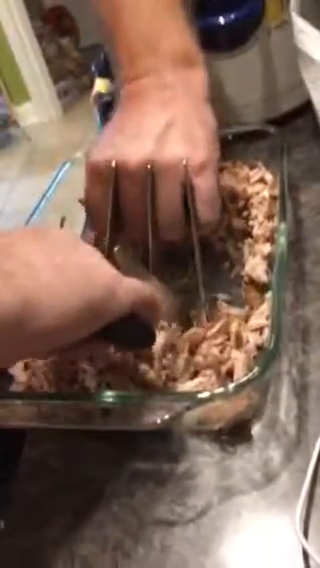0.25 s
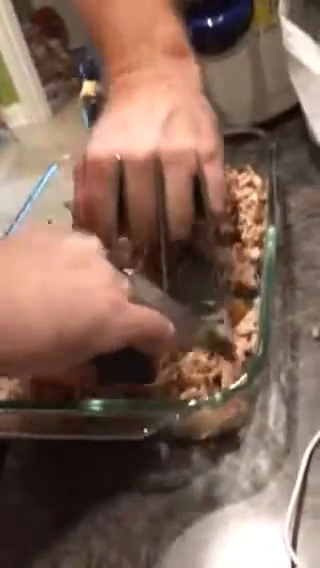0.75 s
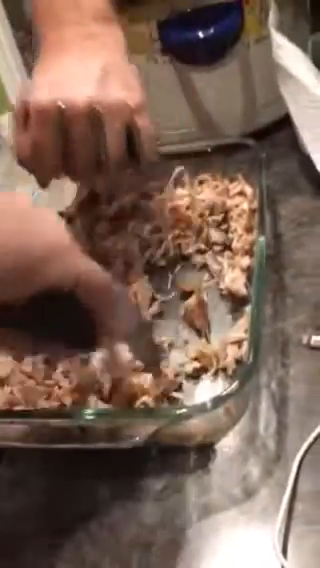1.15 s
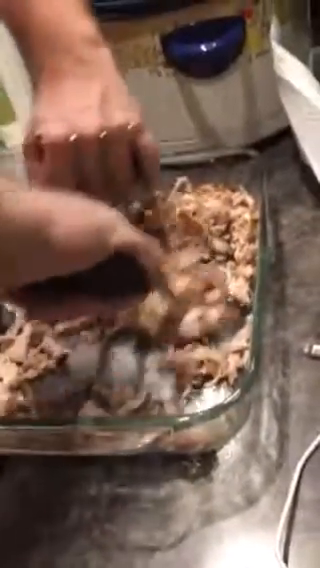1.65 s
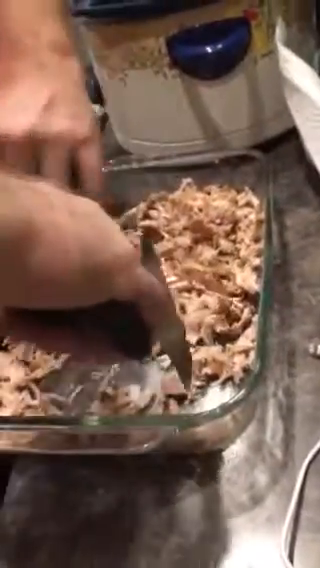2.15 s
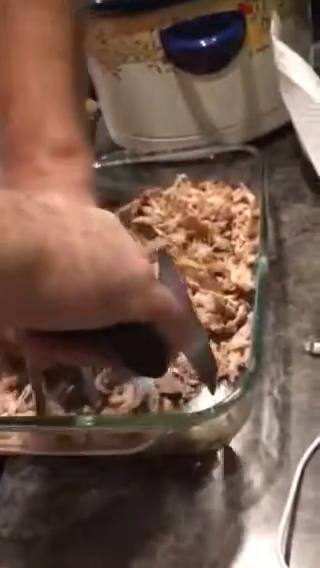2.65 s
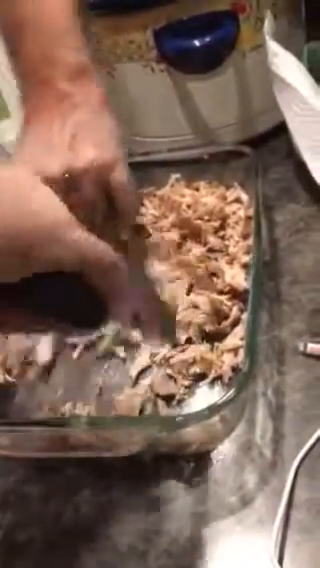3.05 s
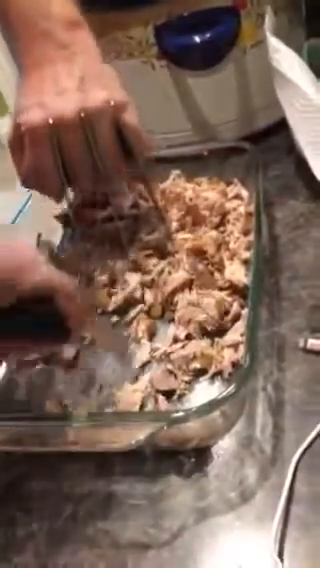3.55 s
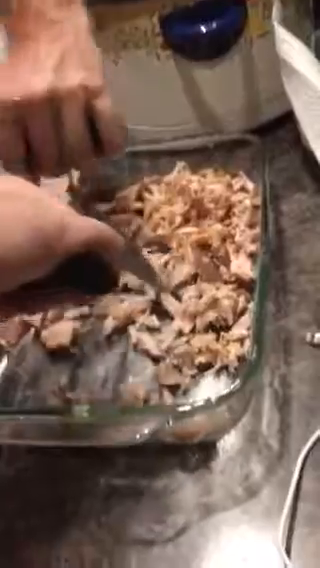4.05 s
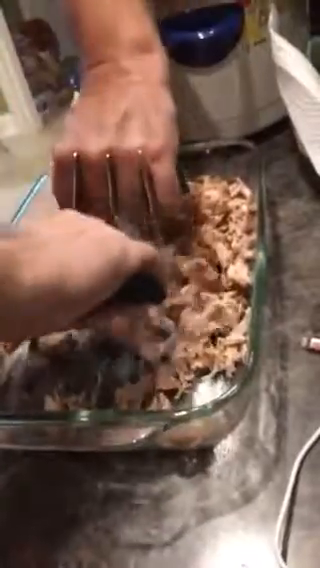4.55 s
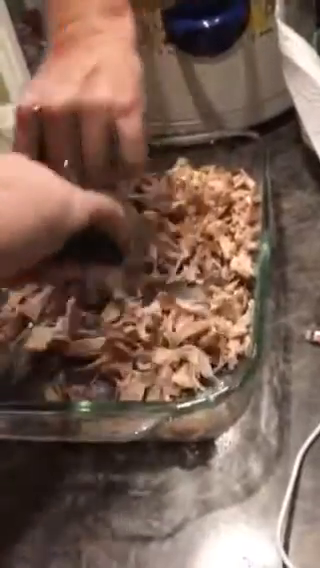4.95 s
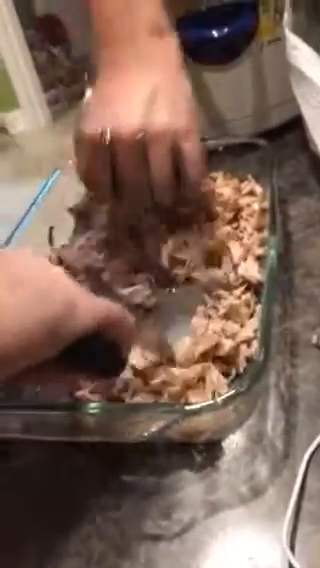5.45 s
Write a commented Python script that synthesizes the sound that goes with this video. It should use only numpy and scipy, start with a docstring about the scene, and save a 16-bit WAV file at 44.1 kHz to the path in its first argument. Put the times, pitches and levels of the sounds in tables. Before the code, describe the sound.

Close, sharp steel-on-glass clinks with short gritty scrapes, separated by quiet pauses over a faint low hum and soft hiss.

```python
"""Pulling cooked meat apart with steel claws

Steel claws shred meat in a glass dish on a kitchen counter, close to a phone.
Each knock rings sets of fading tones for dish, claw and counter, with a burst of noise for the chatter.
Each drag sends gritty noise through the dish and claw tones, with a hollow note and a thin steel hiss.
Behind them are the room's echo, a fridge hum of wavering tones, and soft shaped hiss."""
import sys
import numpy as np
from scipy import signal
from scipy.fft import rfft, irfft
from scipy.io import wavfile
from scipy.ndimage import uniform_filter1d

SR = 44100
rng = np.random.default_rng(int(sys.argv[2]) if len(sys.argv) > 2 else 0)


def bounce(signal):
    """Save signal as a 16-bit WAV file at the path given by the first command-line argument."""
    frames = np.transpose(np.atleast_2d(signal))
    limited = np.clip(frames, -1, 1)
    pcm = np.round(limited * 32767).astype(np.int16)
    wavfile.write(sys.argv[1], SR, pcm)


N = 251590  # length in samples


def undb(db):
    """Turn decibels into a plain amplitude factor."""
    return 10 ** (np.asarray(db) / 20)


def level(x, db):
    """Scale a sound to an rms level in dB."""
    return x * undb(db) / np.sqrt(np.mean(x ** 2))


def band(x, lo_hz, hi_hz, order=2):
    """Keep the range between two frequencies; 0 leaves that edge open."""
    if lo_hz:
        x = signal.sosfilt(signal.butter(order, lo_hz, "high", fs=SR, output="sos"), x)
    if hi_hz:
        x = signal.sosfilt(signal.butter(order, hi_hz, fs=SR, output="sos"), x)
    return x


def ring(modes, freedom, gain_db=0, phase=0, size=12000):
    """Add up a body's natural tones (modes), each dying away; freedom scales their ring times."""
    hz, db, t60 = np.transpose(modes)[:, :, None]
    t = np.arange(size) / SR
    fade = np.exp(-np.log(1000) * t / (t60 * freedom))
    tones = undb(db + gain_db) * fade * np.sin(2 * np.pi * hz * t + phase)
    return tones.sum(axis=0)


def walk(rate):
    """Draw random values at a rate per second and smooth them twice; they spread around 0 by about 1."""
    k = int(SR / rate)
    steps = np.repeat(rng.standard_normal(N // k + 1), k)
    smooth = uniform_filter1d(uniform_filter1d(steps, k), k)
    return 1.3 * smooth[:N]


# Natural tones of the counter, the glass dish and the steel claw.
# Each row: frequency in Hz, relative level in dB, time in seconds to fall 60 dB when free.
COUNTER_MODES = [(96, -17, 0.1), (142.7, -7, 0.28), (168.4, -5.5, 0.17), (179, -21.5, .1), (259, -14, 0.12),
                 (321, -16, .1), (361.1, -7, 0.044), (525, -17, 0.1)]
DISH_MODES = [(684, -26.5, 0.027), (860, -8.5, 0.061), (968, -0.5, 0.097), (1090, -10, .06),
              (1212, -7.5, 0.33), (1305, -6, 0.21), (1420, -10, 0.21), (1617, -2.5, 0.059), (1642, -9, .06),
              (1886.6, -5.5, .07), (2090, -4.5, 0.094), (1957, -2.5, .08), (2142, 1, 0.096),
              (2322.5, -7.5, 0.057), (2386, -0.5, .1), (2546, -2.5, .07), (2746, -7.5, 0.099),
              (2862, -5, 0.1), (3045, -3.5, 0.09), (3016, -10.5, 0.098), (3300, -4.5, 0.15),
              (3395, -12.5, .07), (3635, -11.5, 0.059)]
CLAW_MODES = [(3805, -5.5, .13), (4000, -6, 0.15), (4206, -2.5, .13), (4514, -6, .12), (4910, -12, .1),
              (5090, -9.5, .13), (5355, -9, 0.061), (5494, -8.5, 0.15), (5540, -8, .2), (6200, -12, .07),
              (6380, -11, .07), (6413, -8.5, 0.11), (6710, -12, 0.12), (7080, -12, .1), (7760, -12.5, .1),
              (8600, -12, 0.17), (9220, -15.5, 0.12), (9770, -17, 0.099), (10240, -18.5, .09),
              (10800, -20.5, 0.069)]
# Edges in Hz of six bands, low to high: thud, dish bottom, dish body, dish wall, claw ring, tick.
KNOCK_EDGES_HZ = (70, 220, 600, 1500, 3200, 7000, 13000)
# Tines hitting the glass. Each row: time in seconds, dish-wall peak in dB before the final shaping,
# then thud, dish bottom, dish body, claw ring and tick in dB relative to that peak,
# favoured notes of dish body, dish wall and claw in Hz, contact time in milliseconds.
KNOCKS = [(0.0167, -46.5, -16, -14.5, 5.5, -30, -14, 1210, 2430, 4170, 6.9),
          (0.3502, -8, -28.5, -39.5, -9.5, 3.5, -8.5, 1010, 2340, 4115, 6.4),
          (0.741, -68, 3.5, 9, 7.5, -6, -17, 800, 1750, 4000, 19),
          (0.7764, -35, -36, -50, -9, 18.5, 23.5, 1354, 2580, 4600, 1.5),
          (0.9362, -9.5, -22, -22.5, -10.5, 1, -14, 1300, 2100, 3620, 9.6),
          (0.9589, -1.5, -32.5, -53, -17, 1.5, -8, 967, 2310, 5520, 3.7),
          (1.0601, -29.5, -26.5, -37, -18, -18, -33, 966, 2210, 3850, 7.3),
          (1.5588, -8.5, -27.5, -35, -3.5, -25.5, -27, 1436, 2970, 3800, 5.3),
          (1.5712, -20.5, -14.5, -6, 8, -1.5, -22, 943, 1880, 3800, 6.2),
          (1.7805, -28.5, -18.5, -13, 4, -18.5, -24, 786, 1730, 4220, 14.2),
          (1.793, -35.5, -5, -25, 7.5, -25.5, -24.5, 920, 1700, 4470, 2),
          (2.8921, -17.5, -31, -22, -15, 1, -11.5, 960, 2326, 4150, 4.8),
          (3.0117, -24.5, -41, -28, -19, 11, 9.5, 960, 2830, 6130, 2.6),
          (3.0206, -23, -33, -28, -26, 2.5, 11, 1240, 2500, 6380, 1.8),
          (3.0924, -20, -55, -41, -9, -5.5, -19, 970, 1620, 4600, 6.4),
          (3.1168, -27.5, -45, -45, -38, -18, -35, 1440, 2090, 4200, 3.8),
          (3.5333, -3, -19, -14, -4.5, -2.5, -15.5, 856, 2103, 3940, 6.5),
          (3.703, -18, -23.5, -22, -2, -17, -29, 990, 2120, 4200, 5),
          (3.7278, -28.5, -36.5, -24.5, -3, -6, -24.5, 977, 2030, 3850, 3.9),
          (3.7998, -49.5, -4.5, -8, -15.5, 5.5, 12, 980, 1930, 7190, 9.1),
          (4.5488, -6, -35, -27, -13, -0.5, -11.5, 1196, 2430, 5355, 5.4),
          (4.593, -14, -28.5, -38, -6, -3.5, -20, 1300, 2410, 4500, 4.9),
          (4.7125, -40, -7, -5.5, -27, 4.5, -4, 960, 1970, 4020, 3.3),
          (4.7549, -47, 0, 2.5, 9, 2, -10, 860, 2280, 4080, 1.9),
          (5.288, -5.5, -26.5, -26, -12, 1.5, -11, 1213, 2330, 4374, 10),
          (5.311, -25.5, -43, -21, -39, 9, 7, 1460, 2480, 5600, 4.5),
          (5.3351, -17.5, -26, -40, -24, -4.5, -28, 1500, 1920, 4200, 4.2),
          (5.3531, -24.5, -23, -26, -4.5, -0.5, -12, 1500, 2310, 4170, 8.1),
          (5.5405, -42, -21.5, -26, -3, 0, -13, 762, 2630, 6650, 3.8)]
FREEDOM = 0.85  # share of their free ring time that the meat leaves the modes
# The struck tine buzzes on: rms level in dB before its fade and the claw band's gain, free ring time, blur.
TINE_DB, TINE_T60_S, TINE_BLUR_HZ = -38, 0.45, 70


def knocks(crack_db=7.5, tail_db=-17.5, favour_db=7.5, favour_width=0.03, rattle_db=-11.0, rattle_s=0.018):
    """Each blow rings dish and claw, loud while the tines chatter, then quieter; the counter answers."""
    size = 12000
    out, t = np.zeros(N + size), np.arange(size) / SR
    modes = DISH_MODES + CLAW_MODES
    hz = np.array(modes)[:, :1]
    chance = rng.standard_normal((len(KNOCKS), 2, size))
    for row, (crack_noise, luck_noise) in zip(KNOCKS, chance):
        s, db, thud, bottom, body, claw, tick, *notes_hz, contact_ms = row
        # where the tine lands favours the modes near three notes
        near = sum(np.exp(-(np.log(hz / note) / favour_width) ** 2) for note in notes_hz)
        # random changes of each mode's level and phase
        luck_db, luck_phase = 2 * luck_noise[:2 * len(modes)].reshape(2, -1, 1)
        rung = ring(modes, FREEDOM, favour_db * near + luck_db, luck_phase)

        contact = 1000 * t / contact_ms
        chatter = np.exp(-contact ** 1.2)
        rattle = undb(rattle_db) * np.exp(-t / rattle_s)
        noise = crack_noise * (undb(crack_db) * chatter + rattle)
        blow = rung * (chatter + undb(tail_db)) + band(noise, 700, 6400, order=1)
        blow *= np.minimum(contact / 0.23, 1)  # the onset takes about a quarter of the contact

        under = ring(COUNTER_MODES, FREEDOM, luck_phase[:len(COUNTER_MODES)])  # same draws, now as dB
        under *= np.minimum(t / .004, 1)

        # the counter fills the two lowest bands, the blow the other four
        sources = (under, under, blow, blow, blow, blow)
        edges = zip(sources, KNOCK_EDGES_HZ, KNOCK_EDGES_HZ[1:])
        parts = [band(x, lo, hi, order=3) for x, lo, hi in edges]
        gains_db = db + np.array([thud, bottom, body, 0, claw, tick])

        # slow noise blurs the tine's ringing note into a buzz
        blur = level(band(luck_noise, 0, TINE_BLUR_HZ), TINE_DB)
        buzz = blur * ring([(notes_hz[-1], 0, TINE_T60_S)], 0.89)
        parts[4] = parts[4] / np.abs(parts[4]).max() + buzz

        start = max(int((s - .001) * SR), 0)  # begin 1 ms ahead of the listed time
        out[start:start + size] += sum(undb(g) * p / np.abs(p).max() for g, p in zip(gains_db, parts))
    return out[:N]


# Tines dragging over the glass; the faintest rows only brush through the meat.
# Each row: start in seconds, length in seconds, then starting levels before the final shaping:
# dish rub in dB, claw ring in dB, thin steel hiss in dB;
# then rub trend in dB per second, hollow note in Hz.
DRAGS = [(0.012, 0.22, -59, -66, -81, -250, 1300), (0.369, 0.08, -41.5, -38, -71, -300, 1970),
         (0.431, 0.11, -60.5, -74.5, -94, 55, 1800), (0.543, 0.043, -62.5, -76, -82, 49, 2070),
         (0.773, 0.057, -70, -39, -42.5, -42, 1300), (0.967, 0.09, -40, -34.5, -57.5, -220, 2170),
         (1.034, 0.1, -55.5, -63.5, -85.5, 43, 2100), (1.587, 0.115, -55, -54.5, -64.5, -100, 1484),
         (1.777, 0.079, -49, -48.5, -65, -400, 1520), (2.059, 0.076, -85.5, -77.5, -81.5, -9.5, 2000),
         (2.292, 0.066, -87, -78.5, -84, -11, 2000), (2.729, 0.035, -86.5, -78, -79.5, -10, 2030),
         (2.91, 0.11, -64, -76.5, -71, -12, 2000), (3.011, 0.065, -52.5, -43, -43.5, -27.5, 2040),
         (3.09, 0.065, -47.5, -54.5, -77.5, -180, 1760), (3.547, 0.16, -47, -43, -54, -190, 1590),
         (3.7, 0.066, -39, -40.5, -72, -500, 1550), (3.794, 0.069, -75.5, -84, -54.5, -130, 1950),
         (4.551, 0.18, -34, -30, -54.5, -200, 2270), (4.676, 0.11, -62, -65.5, -72, -16, 1930),
         (4.783, 0.11, -58, -71.5, -78, -10, 2040), (5.039, 0.044, -86, -78, -79, -19.5, 2020),
         (5.139, 0.044, -82.5, -75.5, -77.5, -20, 2000), (5.287, 0.36, -35, -30.5, -45, -200, 2170),
         (5.426, 0.12, -64, -72.5, -100, 94, 1950)]
CATCH_S = 0.011  # time over which a drag sets in
# The tine lifts off fast; the pushed meat slides on faintly.
LIFT_DB_PER_S, CRUMBS_DB, CRUMBS_DB_PER_S = 1200, -14.5, 120
CLAW_SAG, HISS_SAG = 1.4, 3  # the steel follows the rub's trend this many times as steeply
HOLLOW_OCTAVES, HOLLOW_DB = 0.45, 5  # width of the hollow note, its level over the dish modes


def drags():
    """Tines stick and slip over the glass, shown as gritty noise; the slips ring the dish and claw."""
    # dish, claw and thin hiss each catch and let go in their own gritty rhythm
    grit_db = np.array([2.5 * walk(150), 2 * walk(150), walk(150)])
    slips = rng.standard_normal((3, N))
    slips *= undb(1.5 * rng.exponential(size=(3, N)) + grit_db)

    glass = level(signal.fftconvolve(slips[0], ring(DISH_MODES, 1.0))[:N], 0)
    claw_ring = level(signal.fftconvolve(slips[1], ring(CLAW_MODES, 0.76))[:N], 3)
    scrape = level(band(slips[1], 2500, 7000, order=3), 0)
    steel = level(claw_ring + scrape, 0)
    thin = level(band(slips[2], 6000, 12000, order=3), 0)

    out = np.zeros(N)
    for start, length, rub_db, claw_db, hiss_db, trend, hollow_hz in DRAGS:
        # leave a quarter second for the lift-off
        now = slice(int(start * SR), int((start + length) * SR) + SR // 4)
        t = np.arange(len(out[now])) / SR
        trend_db = trend * np.minimum(t, length)
        lifted = np.maximum(t - length, 0)  # seconds since the tine left
        crumbs = (lifted > 0) * undb(CRUMBS_DB - CRUMBS_DB_PER_S * lifted)
        lift = undb(-LIFT_DB_PER_S * lifted) + crumbs

        # the open dish gathers the rub around one broad hollow note
        lo_hz, hi_hz = hollow_hz * 2 ** (HOLLOW_OCTAVES * np.array([-.5, .5]))
        hollow = level(band(slips[0, now], lo_hz, hi_hz, order=3), HOLLOW_DB)
        rub = undb(rub_db + trend_db) * (glass[now] + hollow)
        metal = undb(claw_db + CLAW_SAG * trend_db) * steel[now]
        metal += undb(hiss_db + HISS_SAG * trend_db) * thin[now]
        out[now] += np.minimum(t / CATCH_S, 1) * lift * (rub + metal)
    return out


ROOM_DB = -16  # gain of the echo
ROOM_T60_LOW_S, ROOM_T60_HIGH_S = 0.35, 0.15  # time to fall 60 dB, below and above 2500 Hz


def room(dry):
    """Dense reflections off kitchen walls, made from fading noise; the treble dies sooner."""
    t = np.arange(SR // 2) / SR
    low, high = rng.standard_normal((2, len(t)))
    tail = band(low, 0, 2500) * undb(-60 * t / ROOM_T60_LOW_S)
    tail += band(high, 2500, 9000) * undb(-60 * t / ROOM_T60_HIGH_S)
    tail *= np.clip((t - .003) / 0.0037, 0, 1)  # silent for 3 ms, then a quick rise
    # even out the tail's strength by its middle range
    strength = np.sqrt(np.mean(band(tail, 730, 4900) ** 2) * len(t) * 7)
    return undb(ROOM_DB) * signal.fftconvolve(dry, tail / strength)[:N]


# Tones of the fridge hum. Each row: frequency in Hz,
# rms level in dB before the waver and the final shaping.
HUM = [(60, -80.5), (120, -66), (240, -78.5)]


def fridge():
    """Mains hum: steady-pitched tones whose level and phase waver slowly."""
    t = np.arange(N) / SR
    hum = np.zeros(N)
    for hz, db in HUM:
        loudness = np.sqrt(2) * undb(db + 1.5 * walk(2.8))  # 1.5 dB of waver
        hum += loudness * np.sin(2 * np.pi * hz * t + 0.17 * walk(1))
    return hum


# Tone colour of room air and microphone hiss.
# Each row: frequency in Hz, relative noise level in dB per Hz.
HISS = [(25, -28.5), (55, -16), (100, -10.5), (160, -15.5), (250, -21.5), (400, -27.5), (800, -29),
        (1300, -29), (2200, -36.5), (6700, -38.5), (10000, -42), (15000, -54.5)]
HISS_DB = -68  # rms level before the final shaping


def hiss():
    """Shaped random noise whose upper part swells and sinks a little."""
    hz, db = np.transpose(HISS)
    f = np.maximum(np.fft.rfftfreq(N, 1 / SR), 1)
    colour_db = np.interp(np.log(f), np.log(hz), db, left=-60)
    air = irfft(rfft(rng.standard_normal(N)) * undb(colour_db), N)
    upper = band(air, 2500, 0)
    swell_db = 1.2 * walk(7)
    return level(air + upper * (undb(swell_db) - 1), HISS_DB)


DULL_HZ = 11500  # the claws' treble rolls off above this


def scene():
    """Claws near the phone, their echo, and the kitchen behind."""
    claws = band(knocks() + drags(), 0, DULL_HZ)
    return (claws + room(claws) + fridge() + hiss())[None]


TOP_HZ = 15600  # the phone cuts the sound above this


def record(dry):
    """The phone rounds the loudest peaks and cuts the top."""
    rounded = np.tanh(0.98 * dry) / 0.6
    return signal.sosfilt(signal.ellip(8, .2, 70, TOP_HZ, fs=SR, output="sos"), rounded)


dry = scene()
out = record(dry)
bounce(out)
```